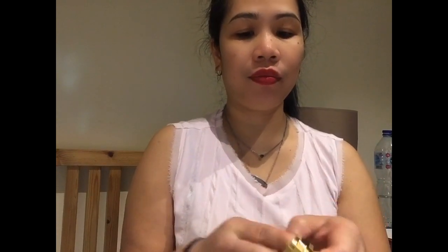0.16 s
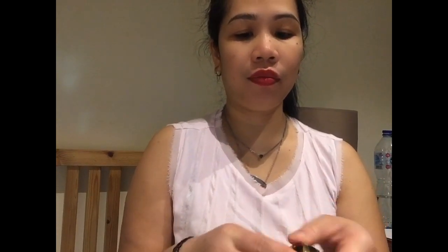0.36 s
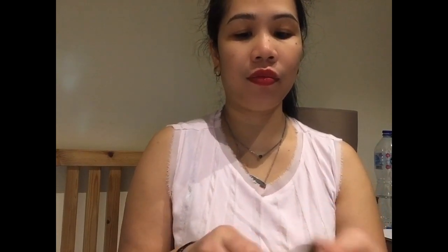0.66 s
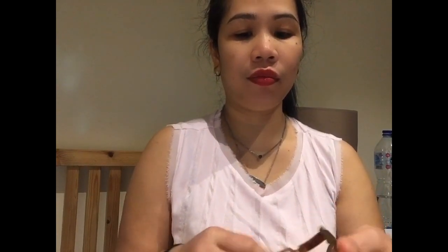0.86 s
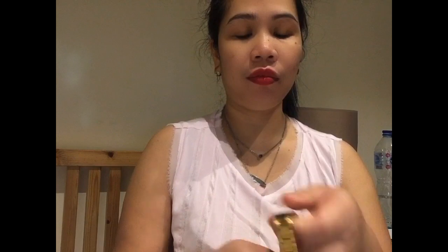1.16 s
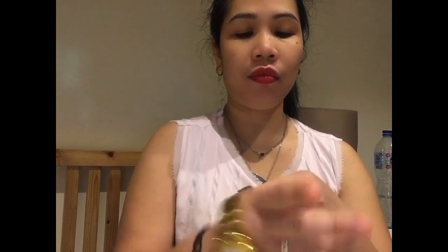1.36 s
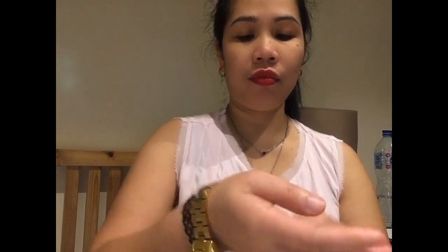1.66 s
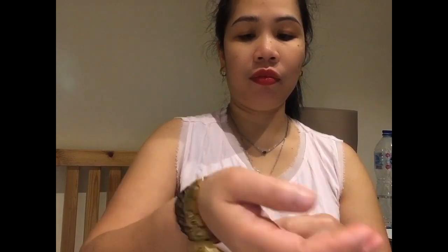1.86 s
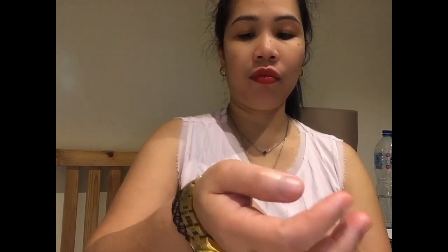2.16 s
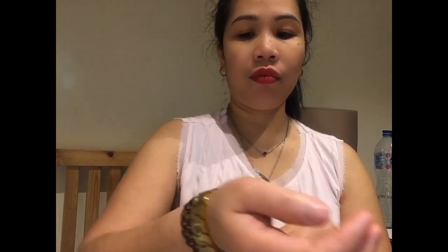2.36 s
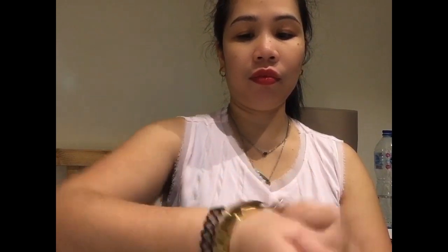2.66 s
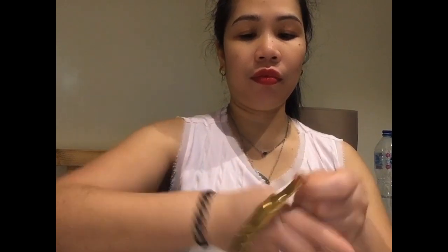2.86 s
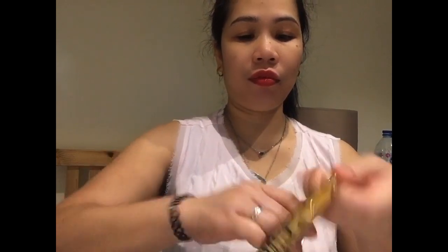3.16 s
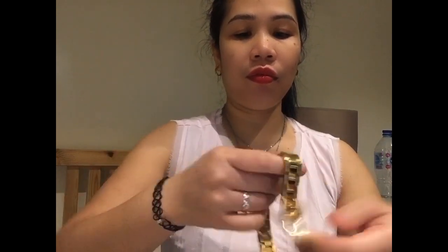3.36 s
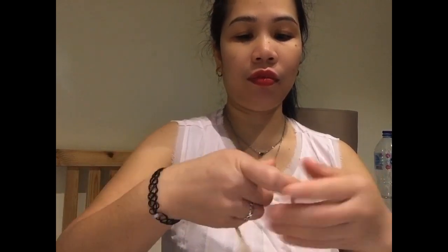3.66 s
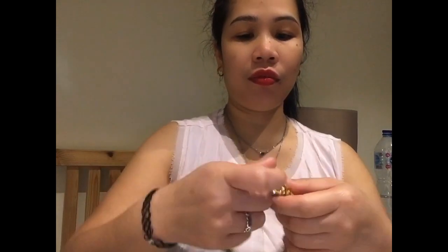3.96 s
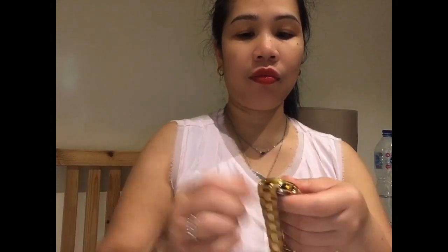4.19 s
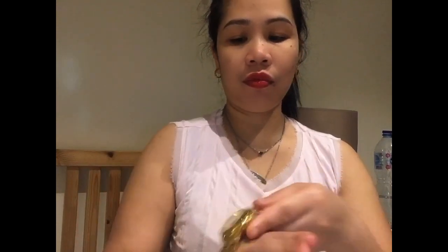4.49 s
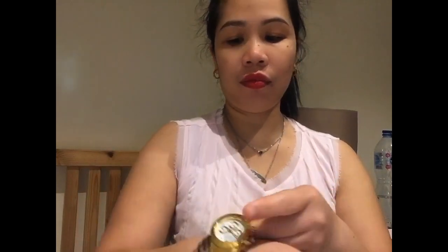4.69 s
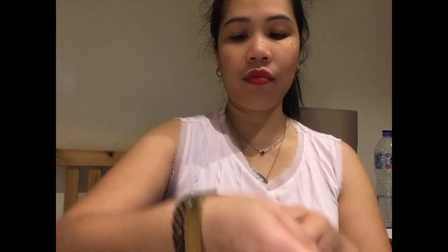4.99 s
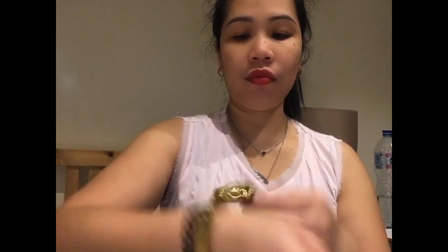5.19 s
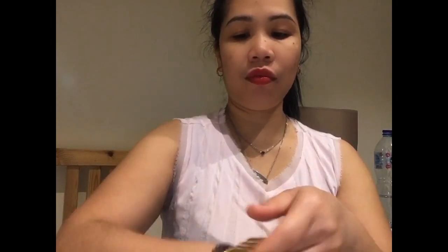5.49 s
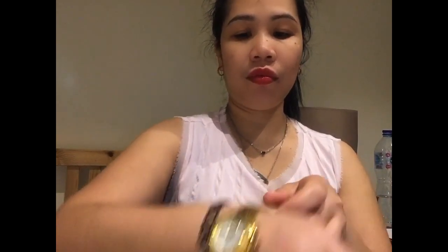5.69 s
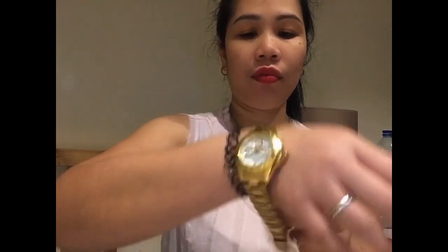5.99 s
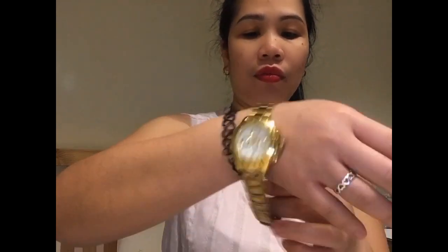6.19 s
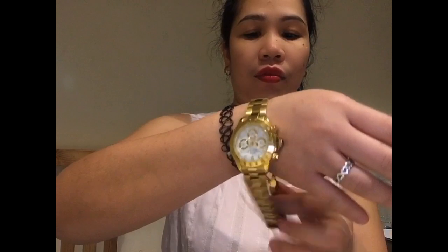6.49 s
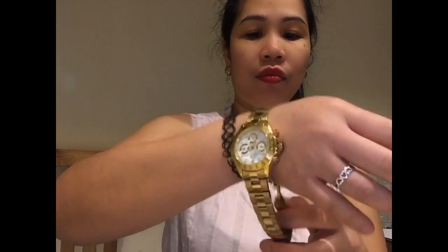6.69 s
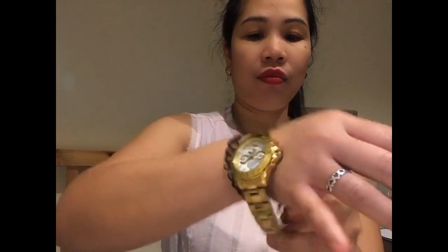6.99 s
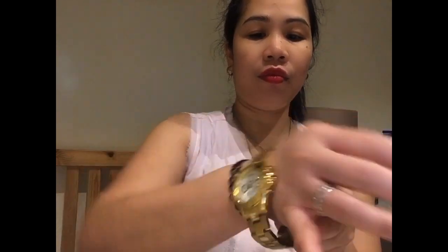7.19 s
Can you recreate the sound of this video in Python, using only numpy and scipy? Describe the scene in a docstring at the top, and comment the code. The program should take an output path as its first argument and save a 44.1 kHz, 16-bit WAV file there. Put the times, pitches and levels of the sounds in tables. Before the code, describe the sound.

Close, light metallic ticks and clasp snaps from a wristwatch being handled and slipped on, with a low hum in a small room.

```python
"""A low hum in a small quiet room, then the clasp of a metal watch snaps open close to the microphone.
The watch slides off one wrist and is slipped on again: the bracelet rustles over the skin,
its links knock together and ring briefly, and each snap of the clasp also knocks the case.
The room answers every click and rustle with a short tail; faint microphone hiss lies underneath."""
import sys
import numpy as np
from scipy import signal
from scipy.fft import rfft, irfft
from scipy.io import wavfile
from scipy.ndimage import uniform_filter1d

SR = 44100
rng = np.random.default_rng(int(sys.argv[2]) if len(sys.argv) > 2 else 0)


def digitize_waveform(pressure):
    """Quantize a signal to 16-bit integers and store it at the path in sys.argv[1].

    Rows of a 2-D input are taken as channels; values are limited to [-1, 1].
    """
    field = np.atleast_2d(pressure).T
    bounded = np.clip(field, -1, 1)
    quanta = np.round(bounded * 32767).astype(np.int16)
    wavfile.write(sys.argv[1], SR, quanta)


N = 323717
TIME = np.arange(N) / SR


def from_db(db):
    """Decibels to gain."""
    return 10 ** (np.asarray(db) / 20)


def rms_one(x):
    """Scale to an rms of 1."""
    return x / np.sqrt(np.mean(x ** 2) + 1e-20)


def one_ms(x):
    """Scale to the energy of one millisecond at rms 1, the reference for contact levels."""
    return x * np.sqrt(SR / 1000 / (np.sum(x ** 2) + 1e-20))


def at_hz(points, hz):
    """Read (f/Hz, value) rows on a logarithmic frequency axis."""
    known_hz, values = np.transpose(points)
    return np.interp(np.log(np.maximum(hz, 1)), np.log(known_hz), values)


def coloured(x, spectrum):
    """Filter a noise by (f/Hz, level/dB) rows."""
    hz = np.fft.rfftfreq(len(x), 1 / SR)
    return irfft(rfft(x) * from_db(at_hz(spectrum, hz)), len(x))


def dying(t, t60):
    """Exponential decay that loses 60 dB in t60 seconds."""
    return from_db(-60 * t / t60)


def add(track, s, sound):
    """Mix a sound into a track from time s."""
    start = max(round(s * SR), 0)
    track[start:start + len(sound)] += sound[:max(N - start, 0)]


# Room tone, relative spectrum: f/Hz, level/dB
HUM_SPECTRUM = [(13, -17.5), (23, 1), (29, -7), (50, 1.5), (66, -3.5), (92, -12), (122, -27), (132, -24),
                (155, -29.5), (213, -26), (300, -32.5), (400, -35), (520, -44), (1000, -53)]
# Room tone at the microphone: t/s, level/dB
HUM_LEVEL = [(0, -45), (.95, -41), (1.45, -43.5), (6.6, -43), (7.34, -44)]


def room_hum():
    """The low hum of the room: rumbling noise, held steady from one quarter second to the next."""
    rumble = rms_one(coloured(rng.standard_normal(N), HUM_SPECTRUM))
    steady = rumble / np.sqrt(uniform_filter1d(rumble ** 2, size=SR // 4))
    return from_db(np.interp(TIME, *np.transpose(HUM_LEVEL))) * steady


# Self-noise of the microphone, relative spectrum: f/Hz, level/dB
HISS_SPECTRUM = [(300, 4.5), (1000, 4), (2000, 1.5), (4000, -3), (8000, -5.5), (10300, -12), (13000, -9),
                 (16000, -0.5)]


def microphone_hiss(level_db=-67.5):
    """The microphone's own faint, even noise."""
    return from_db(level_db) * rms_one(coloured(rng.standard_normal(N), HISS_SPECTRUM))


# Colour of the watch's metal as heard in its short echoes: f/Hz, level/dB
TAIL_COLOUR = [(500, -1), (1100, -2), (2600, -2), (4100, 1.5), (5100, -5.5), (6500, 3), (9000, 2.5),
               (10400, -4.5), (12500, -1), (16000, 1)]


def room(x, first_echo_s=0.00083, build_up_s=0.0065, t60=0.26, treble_t60=0.27, treble_hz=10500):
    """Near walls return dense, uneven echoes that build up within milliseconds; each tail is new."""
    t = TIME[:SR // 3]
    uneven = rng.standard_normal(len(t)) * np.exp(0.9 * rng.standard_normal(len(t)))
    echoes = coloured(uneven, TAIL_COLOUR)
    lower = signal.sosfiltfilt(signal.butter(2, treble_hz, fs=SR, output="sos"), echoes)
    tail = lower * dying(t, t60) + (echoes - lower) * dying(t, treble_t60)
    tail *= np.clip((t - first_echo_s) / build_up_s, 0, 1)
    return signal.fftconvolve(x, tail / np.sqrt(np.sum(tail ** 2)))[:N]


# At the wrist, the hand draws the bracelet over skin and fingers: t/s, length/s, relative level/dB
STROKES = [ (0.933, 0.12, -56.5), (1.22, 0.59, -67), (2.143, 0.24, -69), (2.58, 0.21, -61.5),
           (2.92, 0.11, -65), (3.205, 0.37, -60.5), (3.975, 0.41, -66), (4.29, 0.158, -56.5),
           (4.496, 0.337, -64), (5.073, 0.47, -67.5), (5.72, 0.39, -65), (6.82, 0.043, -54),
           (6.915, .22, -74)]


def movement(attack_s=0.025, release_s=0.04, resting_db=-77):
    """How strongly the bracelet slides: each stroke swells, holds and fades, never to full rest."""
    gain = from_db(resting_db)
    for s, length, db in STROKES:
        rise = np.clip((TIME - s) / attack_s + .5, 0, 1)
        fall = np.exp(-np.maximum(TIME - s - length, 0) / release_s)
        gain = np.maximum(gain, from_db(db) * rise * fall)
    return gain


# Links sliding on skin, close up, relative spectrum: f/Hz, level/dB
SLIDE_COLOUR = [(400, -2.5), (1200, -9.5), (3800, 0), (6000, -2.5), (8600, -3.5), (10300, 3.5),
                (13000, 4.5), (16000, -7)]


def sliding(moving, ticks_per_s=130, size_spread_db=6.0, tick_t60=0.011, friction=0.46):
    """Tiny ticks of the link joints over the smooth hiss of metal on skin."""
    sizes = from_db(size_spread_db * np.minimum(rng.exponential(1, N), 4))
    ticks = sizes * (rng.random(N) < ticks_per_s / SR)
    bursts = signal.lfilter([1], [1, -dying(1 / SR, tick_t60)], ticks + 1e-18)
    rustle = rng.standard_normal(N) * (rms_one(bursts) + friction)
    return moving * rms_one(coloured(rustle, SLIDE_COLOUR))


def loose_ticks(moving, mean_per_s=6, level_db=(-58, -50), pitch_hz=(8370, 15000)):
    """Loose links tick by chance, more often while the bracelet moves; gives rows like CLINKS."""
    times = TIME[rng.random(N) < mean_per_s * moving / moving.mean() / SR]
    draws = rng.uniform(size=(len(times), 2))
    return [(s, np.interp(size, [0, 1], level_db), 0, np.interp(pitch, [0, 1], pitch_hz), -4, -3)
            for s, (size, pitch) in zip(times, draws)]


def struck(modes):
    """A knocked part rings in damped sines, one per (f/Hz, level/dB, t60/s) row."""
    t = TIME[:SR // 16]
    return sum(from_db(db) * one_ms(np.sin(2 * np.pi * hz * t) * dying(t, t60)) for hz, db, t60 in modes)


# Body, middle, high and top bands of a metal contact: low f/Hz, high f/Hz, filter order
BANDS = [(1150, 3500, 2), (3700, 7900, 4), (8100, 11500, 4), (11500, 16500, 4)]
BAND_CENTRES_HZ = np.array([np.sqrt(low * high) for low, high, _ in BANDS])


def crack(band_db, snap=0.6, t60=0.005, rattle_t60=0.046, rattle_share=0.54):
    """Metal hits metal: an impulse and a burst of noise, over at once but for a short rattle."""
    t = TIME[:SR // 16]
    blow = dying(t, t60) + rattle_share * dying(t, rattle_t60)
    out = np.zeros(len(t))
    for db, (low, high, order) in zip(band_db, BANDS):
        force = snap * one_ms(t == 0) + one_ms(rng.standard_normal(len(t)) * blow)
        band_pass = signal.butter(order, [low, high], "band", fs=SR, output="sos")
        out += from_db(db) * one_ms(signal.sosfilt(band_pass, force))
    return out


def tilted(band_db, db_per_octave, pivot_hz=7000):
    """A harder contact tilts the band levels of its crack towards the treble."""
    return np.array(band_db) + db_per_octave * np.log2(BAND_CENTRES_HZ / pivot_hz)


# Ring time of links damped in the hand: f/Hz, t60/s
LINK_DECAY = [(4700, 0.0067), (6200, 0.022), (7300, 0.037), (8500, 0.034), (9400, 0.014), (12000, 0.013),
              (14500, 0.024), (15400, 0.017)]


def link_ring(hz, db, trim_db=-1.5, detune=0.026):
    """Three neighbouring links are almost alike, so their modes beat."""
    t = TIME[:SR // 16]
    t60 = at_hz(LINK_DECAY, hz)
    # detune is the share of the pitch at a t60 of 15 ms; more damped modes lie further apart
    down, up = detune * .015 / t60 * rng.uniform(.7, 1.3, size=2)
    below, centre, above = (np.sin(2 * np.pi * hz * (1 + offset) * t) for offset in (-down, 0, up))
    ring = (centre + .5 * (above - below)) * dying(t, t60)
    return from_db(db + trim_db) * one_ms(ring)


# Colour of a link's crack: level/dB for each of BANDS
LINK_CRACK_DB = [-20.5, -8.5, -5, -3.5]
# The small pin of a link: f/Hz, level/dB re the crack's top band, t60/s
PIN_MODES = [(15300, -12, 0.0091)]
# Links close to the microphone; one behind the hand reaches it mostly by way of the room:
# t/s, level/dB, tilt/(dB/octave), ring f/Hz, ring/dB re level before trim, room/dB re direct
CLINKS = [ (.4815, -34, -6, 6680, -0.5, -4), (.7957, -46, -5.5, 12500, 2, 3),
          (.9128, -33.5, 2, 8530, -4, -2.5), (1.028, -40.5, 2, 8370, 3.5, -3.5),
          (1.033, -43, -1, 13770, 5, -6), (1.057, -48, -5, 14290, 6, -13),
          (1.131, -36, 3.5, 6170, 10.5, -5), (1.133, -47, -3, 4830, 11, -2),
          (1.139, -47.5, -0.5, 5700, 1, 17.5), (1.164, -43, 0, 6800, 5, -0.5),
          (1.28, -41.5, -1, 13100, 3.5, -5), (1.2926, -43.5, -3, 15700, -7, -6),
          (1.416, -51, 0, 8560, 2.5, -3), (1.5191, -53, -6, 15000, 17, -7.5),
          (1.554, -52, 7, 8960, 3.5, -4.5), (1.7568, -42.5, 4, 7220, -6.5, -2),
          (1.9034, -56, 7, 15300, 6, 2), (2.18, -47, -2, 8320, -4.5, -2), (2.276, -52, -3, 8740, 2, -7),
          (2.317, -45.5, 1, 7160, -9, -6), (2.531, -46.5, -3, 12240, 4, -2.5),
          (3.1893, -46, 3, 8400, -6, -2), (3.2099, -44, -2.5, 14490, -9, -6),
          (3.2884, -32, 5, 9480, 9, -9.5), (3.4695, -47, 2, 13400, 2, 1), (3.477, -44.5, 0, 9600, 1, -10),
          (3.5142, -30, 1, 11300, -1, -1), (3.7649, -42.5, 2.5, 9420, -3.5, -3),
          (3.955, -46, 0, 8500, -10, -4), (4.0022, -37, 3.5, 8500, -11, 1),
          (4.0835, -36.5, 2, 8360, -6, -4.5), (4.239, -36, 5, 15100, -8, -4),
          (4.3325, -40, -1, 13600, -7.5, -5), (4.4163, -42, -1, 15600, 5, -9),
          (4.5178, -48, 6, 9600, 1.5, -2), (4.6587, -46, 2, 12880, -8, -2.5),
          (5.096, -45, -4, 13900, -10, 0.5), (5.2316, -35.5, 1.5, 6780, -18.5, 0.5),
          (5.3769, -51, 6, 8400, 4, -1), (5.7584, -49, 3, 10230, 4.5, 2.5), (5.807, -49, 0, 13430, 3, -3),
          (5.845, -48, -6.5, 13600, 1, -3), (5.8912, -46.5, -5, 11600, 2, -6),
          (5.952, -48.5, 8.5, 14200, -8, -1), (6.2221, -52.5, -2, 11600, 4, 1),
          (6.6514, -46.5, -5.5, 11440, -3.5, -6), (6.8652, -44, -7, 15100, 8, -9),
          (7.0722, -61, 0, 8560, 12.5, -3), (7.3289, -40.5, 0, 12050, 5.5, -2)]


def links(moving, lift_db=3.5, lift_per_ring_db=0.55, lift_octaves=0.3):
    """One link falls against the next and sets its pin ringing; a free link rings, a held one ticks."""
    out = np.zeros(N)
    for s, db, tilt, ring_hz, ring_db, room_db in [*CLINKS, *loose_ticks(moving)]:
        # the crack is lifted around the ring's pitch, the more the freer the link rings
        nearness = np.exp(-(np.log2(BAND_CENTRES_HZ / ring_hz) / lift_octaves) ** 2)
        band_db = db + tilted(LINK_CRACK_DB, tilt) + nearness * (lift_db + lift_per_ring_db * ring_db)
        pin = from_db(band_db[-1]) * struck(PIN_MODES)
        clink = crack(band_db) + link_ring(ring_hz, db + ring_db) + pin
        add(out, s, clink)
        add(out, s, from_db(room_db) * room(clink))
    return out


# Colour of the clasp's crack: level/dB for each of BANDS
CLASP_CRACK_DB = [-0.14, 0.47, -1.5, 1.5]
# The watch case: f/Hz, level/dB re the crack's body band, t60/s
CASE_MODES = [(587, -15.5, 0.0093), (1404, -17, 0.027), (2960, -9, 0.014)]
# The clasp, close to the microphone:
# t/s, level/dB, tilt/(dB/octave), ring f/Hz, ring/dB re level before trim, room/dB re direct
SNAPS = [ (0.3546, -39, -0.5, 4580, 2.5, -7.5), (0.374, -38.5, 2.5, 7250, -12, -7.5),
         (0.4696, -32, 4.5, 10700, 3.5, -2.5), (2.7632, -41.5, 1.5, 2580, -3, -3),
         (5.273, -44, 3.5, 7270, 2, -7), (6.4346, -48, -1.5, 6200, -15, -3),
         (6.8404, -40, 3, 6300, -8, -2.5)]


def clasp():
    """Each snap cracks, rings and knocks the case; the watch moves, so each echo is different."""
    out = np.zeros(N)
    for s, db, tilt, ring_hz, ring_db, room_db in SNAPS:
        band_db = db + tilted(CLASP_CRACK_DB, tilt)
        case = from_db(band_db[0]) * struck(CASE_MODES)
        snap = crack(band_db) + link_ring(ring_hz, db + ring_db) + case
        add(out, s, snap)
        add(out, s, from_db(room_db) * room(snap))
    return out


def scene(slide_db=-3.5):
    """One microphone in a small room: room tone behind, the watch close in front."""
    moving = movement()
    rustle = from_db(slide_db) * sliding(moving)
    background = room_hum() + microphone_hiss()
    return (background + rustle + room(rustle) + clasp() + links(moving))[None]


def record(dry, cutoff_hz=15700):
    """The top of the microphone's signal is cut steeply."""
    return signal.sosfilt(signal.ellip(10, .2, 70, cutoff_hz, fs=SR, output="sos"), dry)


dry = scene()
out = record(dry)
digitize_waveform(out)
```